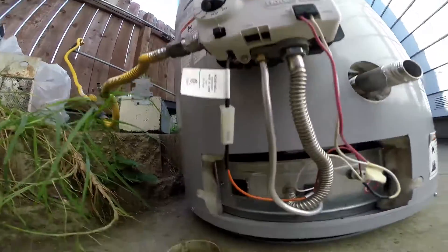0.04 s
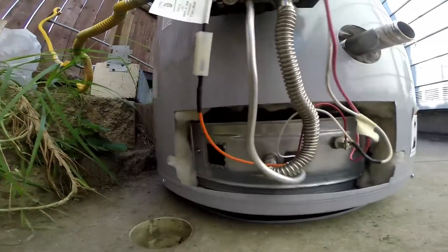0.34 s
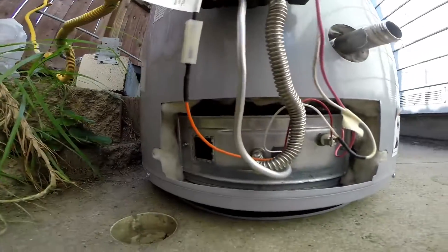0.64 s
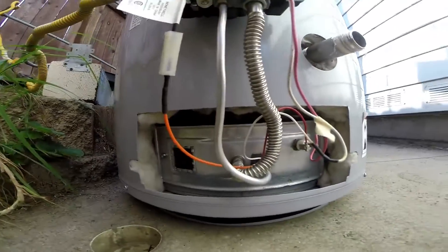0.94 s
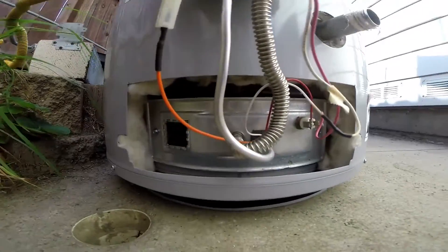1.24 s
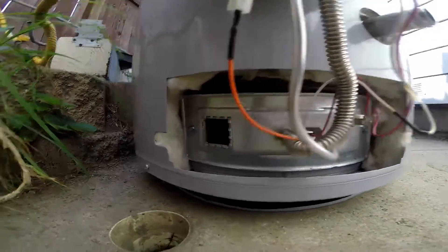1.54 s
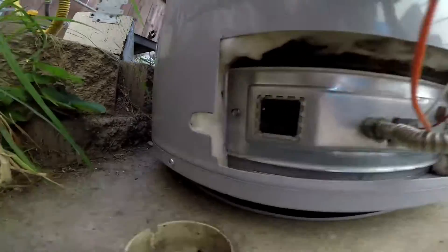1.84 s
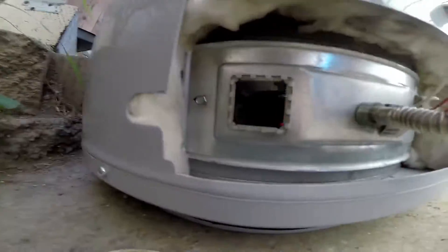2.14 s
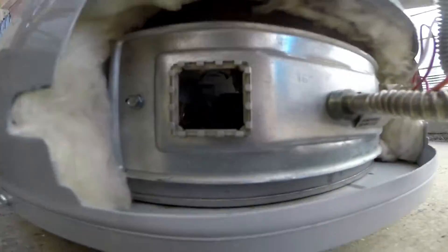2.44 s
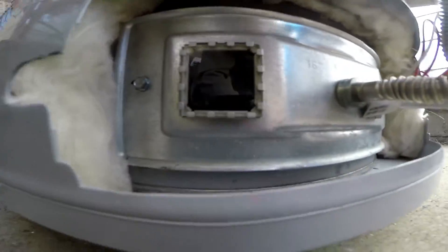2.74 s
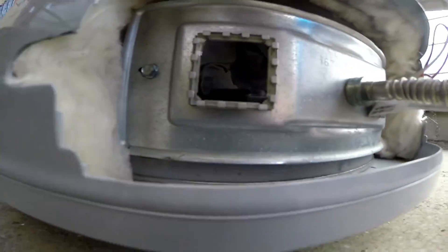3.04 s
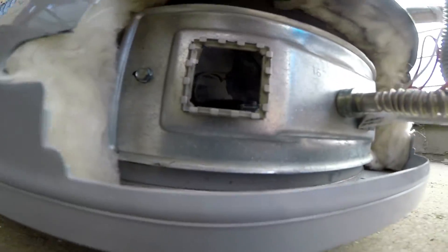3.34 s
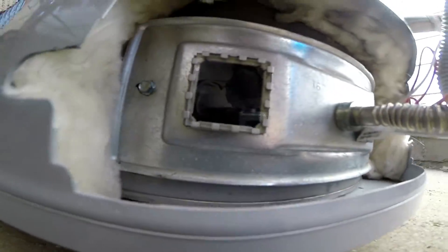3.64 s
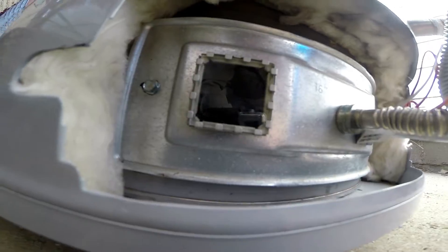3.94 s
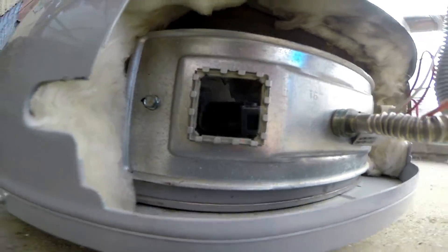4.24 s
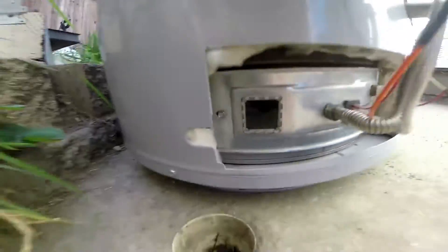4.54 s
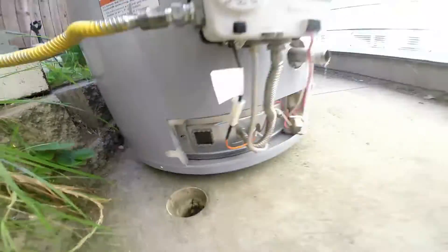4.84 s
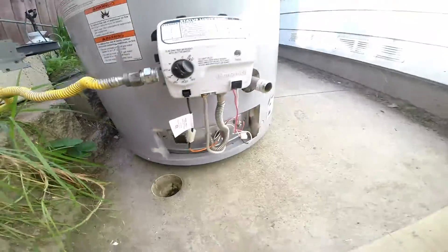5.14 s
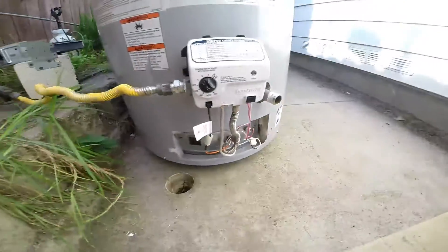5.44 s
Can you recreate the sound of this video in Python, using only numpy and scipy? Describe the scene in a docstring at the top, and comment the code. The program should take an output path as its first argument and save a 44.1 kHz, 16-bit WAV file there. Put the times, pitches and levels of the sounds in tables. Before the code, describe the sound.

The gas burner of an outdoor water heater gives a low, throbbing rumble, with a hollow flutter of small flames and a faint gas hiss. It grows louder as the hand-held microphone moves close, then fades as it backs away near the end. Fingers rub, scrape and knock on the plastic camera case, with a sharp scrape early, a knock midway and a cluster of clicks late. Faint yard hiss lies behind.

```python
"""The gas burner of an outdoor water heater rumbles: its swirling flame booms in the chamber and flue.
Small flames flutter above the boom, and the gas jet hisses faintly with a thin whistle.
The burner grows louder as a hand-held camera moves up to its sight glass, and fades as it backs off.
Fingers rub, scrape and knock on the camera's plastic case, which rings at its own pitches.
Behind it all lie the faint rumble and hiss of the yard."""
import sys
import numpy as np
from scipy import signal
from scipy.fft import rfft, irfft
from scipy.io import wavfile
from scipy.ndimage import uniform_filter1d

SR = 44100
rng = np.random.default_rng(int(sys.argv[2]) if len(sys.argv) > 2 else 0)


def put_to_file(sound):
    """Save the sound as 16-bit audio at rate SR, in the file named by the first command-line argument."""
    columns = np.atleast_2d(sound).T  # one column per channel
    safe = np.clip(columns, -1, 1)
    whole_steps = np.round(safe * 32767)
    wavfile.write(sys.argv[1], SR, whole_steps.astype(np.int16))


N = 251811
T = np.arange(N) / SR
HZ = np.maximum(np.fft.rfftfreq(N, 1 / SR), 1)

# how far the camera is from the burner: time_s, distance_m
CAMERA_PATH = [(0, 0.7), (.3, 0.27), (.6, 0.42), (1.15, 0.35), (1.5, 0.45), (2.05, 0.26), (2.95, 0.22),
               (3.2, 0.22), (3.55, 0.2), (3.95, 0.25), (4.17, 0.26), (4.55, 0.23), (5.3, 0.89),
               (5.71, 0.77)]
# tone of the deep outdoor rumble: frequency_hz, level_db
RUMBLE_TONE = [(10, -40), (28, 7), (45, -11.5), (80, 1.5), (300, -16.5), (1000, -86), (4000, -100)]
# tone of the yard's hiss: frequency_hz, level_db
YARD_TONE = [(200, -11), (500, -5), (1000, -3.5), (1500, 3), (2000, -1.5), (3000, -7.5), (4200, -9.5),
             (6000, -17.5), (15000, -35)]

# pitches at which the plastic case rings: pitch_hz, width_hz, level_db
CASE_RINGS = [(1301, 60.5, 4.5), (2030, 86, -6.5), (2420, 130, -3), (2820, 73, -8.5), (2990, 107, -3.5),
              (3530, 57, -4.5), (4200, 210, -14), (5600, 140, -10.5), (5830, 100, -16.5), (6380, 500, -17),
              (10600, 380, -34), (11300, 480, -22), (13450, 250, -26)]
# tone of skin sliding on plastic: frequency_hz, level_db
SKIN_TONE = [(200, -20.5), (600, -18.5), (800, -9), (1030, -18.5), (1290, -11), (1600, -11.5), (2900, -1.5),
             (3280, -20), (3700, -6.5), (5150, -18.5), (6800, -17), (8700, -33.5), (10500, -21.5),
             (12400, -29), (15500, -35)]
# slow strokes of the hand: start_s, length_s, starting_level_db
HAND_STROKES = [(0, 0.089, -61), (0.792, 0.25, -55.5), (1.122, 0.45, -46.5), (1.589, 0.41, -52.5),
                (2.02, 0.22, -56.5), (2.421, 0.044, -51), (2.967, 0.24, -56), (4.368, 0.16, -53),
                (4.702, 0.302, -54.5), (5.051, 0.098, -56), (5.289, 0.12, -51.5), (5.413, 0.36, -59.5)]
# quick slips of a finger: peak_s, level_db, rise_s, fall_s, treble_db
FINGER_SCRAPES = [(1.33, -50, 0.019, 0.027, 5), (1.455, -55, 0.04, .014, 13),
                  (1.523, -29.5, 0.041, 0.018, -7), (1.556, -21.5, 0.015, 0.0054, 0.5),
                  (1.603, -42, 0.0036, 0.021, 2.5), (1.626, -39, .003, .006, 2),
                  (1.655, -39, 0.0094, 0.0062, -11), (1.77, -35.5, 0.015, 0.017, -8),
                  (1.86, -29, .0007, 0.012, -2), (1.873, -25, 0.0065, 0.0098, -11),
                  (1.912, -31.5, 0.018, 0.013, -3), (1.936, -30.5, 0.0011, 0.0059, -7),
                  (1.944, -30, 0.0065, 0.0084, -7), (1.958, -37.5, .004, 0.015, -6),
                  (3.17, -48.5, 0.0062, 0.0082, 4), (4.398, -44.5, 0.035, 0.009, 0.5),
                  (4.503, -43.5, .005, .009, 3), (4.633, -45, 0.052, 0.016, -7),
                  (4.81, -38, 0.014, .008, -1), (4.955, -42, .03, 0.019, -13),
                  (5.349, -41.5, 0.0084, 0.016, -6)]
# half squeaks of a dragging fingertip: start_s, length_s, first_pitch_hz, last_pitch_hz, level_db
FINGER_SQUEAKS = [(1.113, 0.16, 6400, 7200, -64), (1.132, 0.24, 2950, 2980, -50),
                  (1.479, 0.114, 2930, 3030, -36)]
# light, airy brushes of skin: peak_s, level_db, rise_s, fall_s, centre_hz, width_hz
SKIN_BRUSHES = [(.02, -60.5, .05, .17, 5470, 14000), (2.25, -70, .15, 0.33, 8000, 12000),
                (2.805, -63, .06, .02, 7100, 1800), (3.01, -60, .04, 0.081, 6700, 2000),
                (5.06, -59, 0.019, 0.084, 6000, 13000)]
# dull drags of the palm: peak_s, level_db, half_width_s
PALM_DRAGS = [(4.45, -38.5, 0.095), (5.03, -45, 0.055), (5.66, -46.5, 0.033)]
# knocks on the case: start_s, peak_db, spot_pitch_hz, sharpness, treble_db, ping_db
CASE_KNOCKS = [(1.807, -33, 2580, 3, -18, -20), (1.8595, -25, 3320, 6.4, -19, -20),
               (2.058, -35, 2960, 3, -8, -13), (2.143, -31, 2780, 3.6, -7, 1),
               (2.3715, -37, 2760, 4.4, -15, -20), (2.928, -35, 2620, 3.5, 4, -23),
               (3.038, -24, 2080, 1.6, 0, -20), (3.1, -36.5, 2520, 7.4, -11, -20),
               (4.502, -31, 5900, 3, -8, -13), (4.628, -28, 2700, 4.5, 1, 1),
               (4.652, -30.5, 1590, 2.1, -2, -9), (4.71, -40, 3900, 1.4, -7, -7),
               (4.766, -32, 2600, 2.4, 0, -6), (4.7956, -23.5, 3800, 3.8, -6, -1),
               (4.839, -29.5, 2410, 3, -20, -15), (4.902, -33, 2780, 3.8, -10, -12),
               (4.908, -21, 2420, 3.3, -15, -10), (4.9469, -22, 2610, 5.7, -2.5, -4),
               (5.342, -28.5, 2550, 4, -9, -3)]
# soft bumps of the palm: start_s, thud_db, thud_pitch_hz, ring_db
PALM_BUMPS = [(0.342, -49, 430, -44.5), (1.086, -35.5, 423, -47.5), (1.455, -35.5, 586, -45),
              (2.072, -56, 430, -41.5), (2.433, -42, 530, -39), (3.039, -41, 455, -43),
              (4.653, -43, 430, -39), (4.796, -44, 430, -43), (4.814, -46, 430, -41),
              (4.909, -43, 430, -36.5), (4.951, -46, 430, -50), (5.345, -54, 430, -42)]

# tone of the gas jet's hiss: frequency_hz, level_db
JET_TONE = [(600, -2.5), (1100, -2.5), (1400, -8.5), (1650, 0.5), (1900, -4.5), (2450, -5), (2700, 1),
            (3200, -8.5), (3650, -3.5), (4400, -11), (6900, -10.5), (8100, -20), (11200, -15), (12500, -22),
            (15500, -22)]
# tone of the small flames' flutter: frequency_hz, level_db
FLUTTER_TONE = [(100, -46.5), (190, -19.5), (230, 1.5), (280, -1.5), (345, -10), (430, -8.5), (540, -20),
                (720, -20), (850, -27), (1150, -19), (1350, -40.5), (3000, -51), (12000, -101)]
# higher pitches of the chamber, rung by the flutter: pitch_hz, width_hz, level_db
FLUTTER_RINGS = [(668.2, 18.7, -6), (973, 16, -14), (1203, 35, -14.5)]
# tone of the swirling flame: frequency_hz, level_db
FLAME_TONE = [(10, -34.5), (30, -29), (45, -12), (60, -8.5), (75, -4), (100, -11), (125, -11), (142, -12.5),
              (168, -16.5), (188, -28), (218, -27.5), (270, -33), (400, -57), (3000, -110)]
# low pitches of the chamber and flue: pitch_hz, width_hz, level_db
CHAMBER_RINGS = [(98.57, 11.1, 4), (116.95, 9.5, -2), (204.9, 9.5, -11.5)]
# surges and lulls of the flame: time_s, change_db
FLAME_SURGES = [(.11, -2.5), (.26, -8), (.33, 2), (1.54, -7.5), (2.58, -4), (2.96, 4.5), (3.17, -11.5),
                (3.5, 2.5), (3.68, -5), (3.929, 7), (4.19, -8), (4.57, 3.5)]


def undb(db):
    """Turn decibels into a number to multiply by."""
    return 10 ** (np.asarray(db) / 20)


def unit(x):
    """Scale a sound to an average (rms) level of 1."""
    return x / np.sqrt(np.mean(x ** 2))


def causal(gain):
    """A filter with this gain at each frequency, which rings only after it is struck."""
    cepstrum = irfft(np.log(gain + 1e-9), N)
    cepstrum[1:N // 2] *= 2
    cepstrum[N // 2 + 1:] = 0
    return np.exp(rfft(cepstrum))


def tone(points):
    """A filter that follows a curve of (frequency_hz, level_db) points."""
    hz, db = np.transpose(points)
    return causal(undb(np.interp(np.log(HZ), np.log(hz), db)))


def resonances(rings):
    """A filter that rings at each (pitch_hz, width_hz, level_db); narrow ones ring longer."""
    return sum(undb(db) / (1 + 1j * (HZ ** 2 - hz ** 2) / (HZ * width)) for hz, width, db in rings)


def through(x, response):
    """Pass a sound through a filter."""
    return irfft(rfft(x) * response, N)


def noise(response):
    """Fresh noise, shaped by a filter."""
    return through(rng.standard_normal(N), response)


def band(hz, width_hz):
    """Noise of level 1 around one frequency."""
    return unit(noise(resonances([(hz, width_hz, 0)]) ** 2))


def wander(changes_per_s):
    """A smooth random drift, about 1 in size."""
    return unit(noise(np.exp(-(HZ / changes_per_s) ** 2)))


def flare(peak_s, rise_s, fall_s):
    """A level that grows to 1 and dies away again."""
    return np.exp(-np.maximum((peak_s - T) / rise_s, (T - peak_s) / fall_s))


def swell(peak_s, half_width_s):
    """A rounded rise to 1 and back."""
    return np.exp(-((T - peak_s) / half_width_s) ** 2)


def nearness(falloff=1, closest_m=0.2):
    """1 at the sight glass and smaller farther off; a higher falloff fades faster."""
    return (closest_m / np.interp(T, *np.transpose(CAMERA_PATH))) ** falloff


def outdoors(rumble_db=-46, hiss_db=-61.5):
    """A faint, deep rumble, and a hiss of the yard from which the heater shelters the camera."""
    hiss = undb(hiss_db) * unit(noise(tone(YARD_TONE))) / nearness(falloff=0.38)
    return undb(rumble_db) * unit(noise(tone(RUMBLE_TONE))) + hiss


def plastic_case(shell_db):
    """The case as a filter: a few clear pitches over a dense shell sound that dies quickly."""
    # each ring is applied twice, which keeps the gaps between the pitches quiet
    ring_power = sum(undb(db) ** 2 * np.abs(resonances([(hz, 2 * width, 0)])) ** 4
                     for hz, width, db in CASE_RINGS)
    shell_power = np.abs(undb(shell_db) * tone(SKIN_TONE)) ** 2
    return causal(np.sqrt(ring_power + shell_power))


def hand_speed(resting_db=-79, rise_s=0.012, fall_s=0.013, growth_db_per_s=7):
    """How fast the hand slides: each stroke sets in, gathers speed and dies away."""
    speed = undb(resting_db)
    for start_s, length_s, db in HAND_STROKES:
        age = T - start_s
        fade = np.exp(np.minimum(age, 0) / rise_s - np.maximum(age - length_s, 0) / fall_s)
        speed = np.hypot(speed, fade * undb(db + growth_db_per_s * np.clip(age, 0, length_s)))
    return speed


def creaks(ticks_per_s=22, tick_db=7, firm_db=-52, thin_hz=5000):
    """The seams of the case give tiny dry ticks as the grip shifts."""
    ticks = rng.random(N) * (rng.random(N) < ticks_per_s / SR)
    ring = plastic_case(shell_db=-24) / (1 - 1j * thin_hz / HZ) ** 2
    strain = np.minimum(hand_speed(), undb(firm_db))
    return undb(tick_db) * through(ticks * strain, ring / np.abs(irfft(ring, N)).max())


def brushing(palm_hz=265, palm_width_hz=130):
    """Touches too light or soft to ring the case: an airy brush of skin, a dull drag of the palm."""
    skin = sum(undb(db) * flare(peak_s, rise_s, fall_s) * band(hz, width_hz)
               for peak_s, db, rise_s, fall_s, hz, width_hz in SKIN_BRUSHES)
    drag = sum(undb(db) * swell(peak_s, half_width_s) for peak_s, db, half_width_s in PALM_DRAGS)
    return skin + drag * band(palm_hz, palm_width_hz)


def squeaks(spread_hz=130):
    """A fingertip's tiny slips fall almost into step and give a rough, gliding pitch."""
    out = np.zeros(N)
    wobble_a, wobble_b = wander(spread_hz), wander(spread_hz)
    for start_s, length_s, first_hz, last_hz, db in FINGER_SQUEAKS:
        progress = np.clip((T - start_s) / length_s, 0, 1)
        phase = 2 * np.pi * np.cumsum(first_hz + (last_hz - first_hz) * progress) / SR
        rough_note = wobble_a * np.cos(phase) + wobble_b * np.sin(phase)
        out += undb(db) * np.sin(np.pi * progress) * rough_note
    return out


def rubbing(slips_per_s=3000, scatter_db=2.5, treble_hz=4800, pad_hz=1800, pad_db=-5, firm_db=-44):
    """Skin sticks and slips on the case: many tiny clicks, stronger when the finger moves faster."""
    speed = hand_speed()
    treble_level = speed * undb(-5)
    for peak_s, db, rise_s, fall_s, treble_db in FINGER_SCRAPES:
        scrape = undb(db) * flare(peak_s, rise_s, fall_s)
        speed = np.hypot(speed, scrape)
        treble_level = np.hypot(treble_level, scrape * undb(treble_db))
    sizes = undb(scatter_db * np.minimum(rng.exponential(size=N), 5))
    signs = np.sign(rng.standard_normal(N))
    slips = sizes * signs * (rng.random(N) < slips_per_s / SR)
    case = plastic_case(shell_db=0)
    rasp = unit(through(slips, case))
    # each scrape has its own brightness
    dull = through(rasp, 1 / (1 + (HZ / treble_hz) ** 4))
    rasp = dull * speed + (rasp - dull) * treble_level
    # the soft finger pad stirs the lowest ring, and gets no louder once the grip is firm
    pad_level = speed / np.hypot(1, speed / undb(firm_db))
    pad = unit(noise(case / (1 + (HZ / pad_hz) ** 4))) * pad_level
    uneven = undb(1.3 * wander(50))
    return (undb(-0.02) * rasp + undb(pad_db) * pad) * uneven


def bumps(width_hz=280, decay_s=0.0077):
    """The palm nudges the camera: a dull thud, too soft to ring any but the case's lowest pitch."""
    out = np.zeros(N)
    lowest_hz = CASE_RINGS[0][0]
    for start_s, thud_db, hz, ring_db in PALM_BUMPS:
        age = np.maximum(T - start_s, 0)
        thud = undb(thud_db) * band(hz, width_hz)
        ring = undb(ring_db) * np.sqrt(2) * np.sin(2 * np.pi * lowest_hz * age)
        out += (age > 0) * np.exp(-age / decay_s) * (thud + ring)
    return out


def knocks(crunch_s=0.0017, spot_db=2, treble_hz=4400, ping_hz=5680, ping_width_hz=90):
    """A snap and a short crunch: the struck spot rings briefly, the case longer, with a thin ping."""
    out, size = np.zeros(N), 4096
    ring = irfft(plastic_case(shell_db=-1), N)[:size]
    ping = irfft(resonances([(ping_hz, ping_width_hz, 0)]), N)[:size]
    treble_filter = signal.butter(2, treble_hz, "high", fs=SR)
    for start_s, db, hz, sharpness, treble_db, ping_db in CASE_KNOCKS:
        push = 0.2 * rng.standard_normal(size) * np.exp(-T[:size] / crunch_s)
        push[0] += 1  # the snap
        spot = irfft(resonances([(hz, 2 * hz / sharpness, 0)]) ** 3, N)[:size]
        hit = signal.fftconvolve(push, unit(ring) + undb(spot_db) * unit(spot))[:size]
        # each knock has its own brightness, from dull to sharp
        hit = hit + (undb(treble_db) - 1) * signal.filtfilt(*treble_filter, hit, padtype=None)
        hit = unit(hit) + undb(ping_db - 10) * unit(ping)
        start = int(start_s * SR)
        out[start:start + size] += (undb(db) * hit / np.abs(hit).max())[:N - start]
    return out


def gas_jet(hiss_db=-56, waver_db=0.2, whistle_db=-75.5, whistle_hz=5590, swell_db=10):
    """Gas hisses out of a small hole, with a thin whistle that swells once while the camera is close."""
    hiss = unit(noise(tone(JET_TONE))) * undb(hiss_db + waver_db * wander(7.5))
    whistle_level = undb(whistle_db + swell_db * swell(peak_s=2.76, half_width_s=0.48))
    whistle = band(whistle_hz, width_hz=120) * whistle_level
    return hiss * nearness(falloff=0.5) + whistle * nearness(falloff=0.15)


def small_flames(level_db=-43.5, flicker_db=1.26):
    """Small flames flutter, and the chamber's higher pitches give them a hollow ring."""
    ringing = noise(resonances(FLUTTER_RINGS) / (1 + (HZ / 1500) ** 4))
    flutter = unit(noise(tone(FLUTTER_TONE)) + ringing) * undb(flicker_db * wander(14))
    return undb(level_db) * flutter * nearness(falloff=0.52)


def burner(level_db=-20.5, swing_limit=2.8):
    """The swirling flame roars into the chamber and flue, which boom at their low pitches."""
    boom = noise(tone(FLAME_TONE))
    for hz, width_hz, db in CHAMBER_RINGS:
        boom = boom + undb(db) * noise(resonances([(hz, 1.24 * width_hz, 0)]) ** 2)
    # the steady gas flow holds the flame's average power, so only the fast throb is left
    average_power = uniform_filter1d(boom ** 2, size=SR // 4)
    boom = unit(boom / np.sqrt(average_power))
    # the flame can only give so much heat, which softens the biggest swings
    swing = uniform_filter1d(np.abs(signal.hilbert(boom)), size=SR // 50)
    boom = unit(boom / (1 + (swing / swing_limit) ** 4) ** .25)
    surge_db = sum(db * swell(time_s, half_width_s=0.019) for time_s, db in FLAME_SURGES)
    return undb(level_db + surge_db) * boom * nearness()


def scene():
    """The heater in the open air, with the sounds of the hand on top, in one channel."""
    handling = rubbing() + squeaks() + brushing() + creaks() + knocks() + bumps()
    heater = burner() + small_flames() + gas_jet()
    return (heater + outdoors() + handling)[None]


def record(dry):
    """The camera steeply cuts the highest treble."""
    top_hz = 15250
    return signal.sosfilt(signal.ellip(10, .2, 80, top_hz, fs=SR, output="sos"), dry)


dry = scene()
out = record(dry)
put_to_file(out)
```